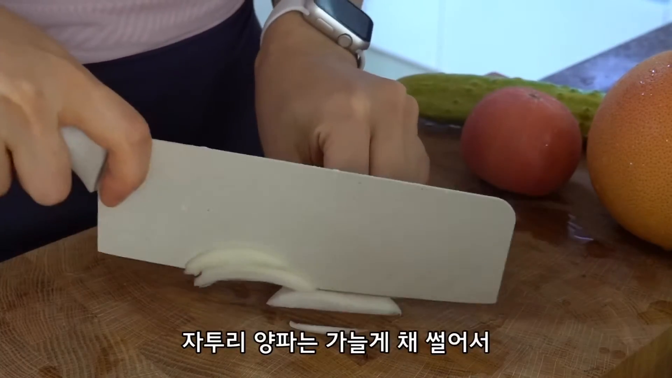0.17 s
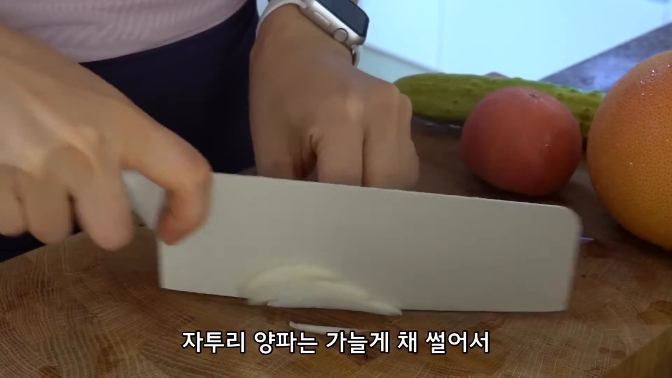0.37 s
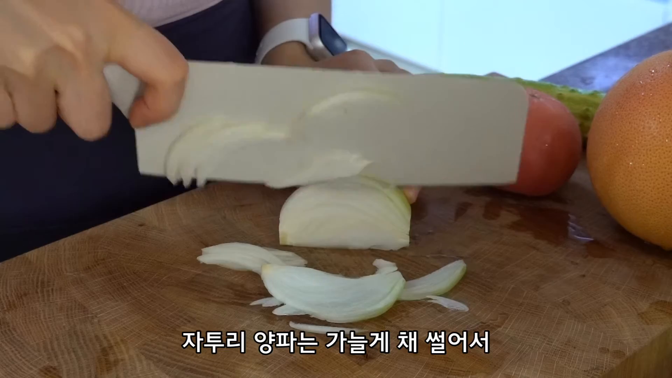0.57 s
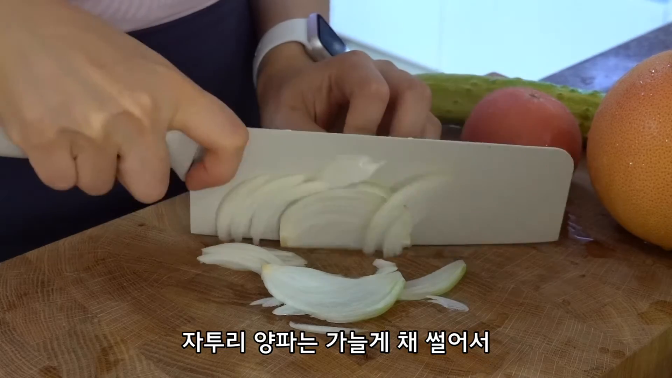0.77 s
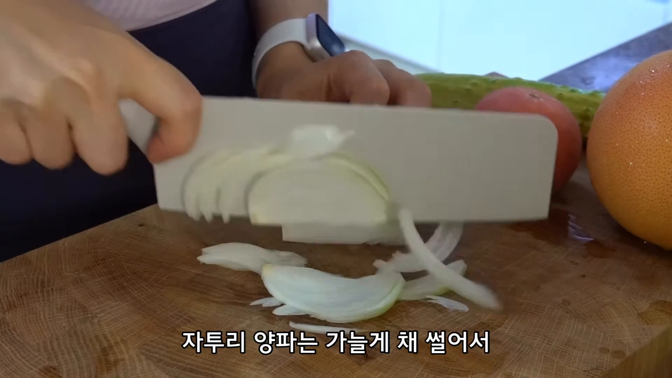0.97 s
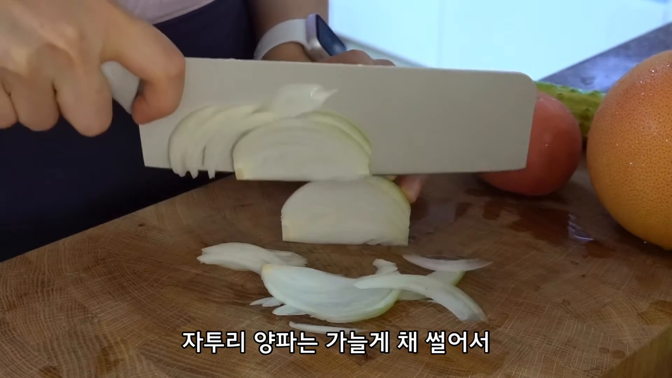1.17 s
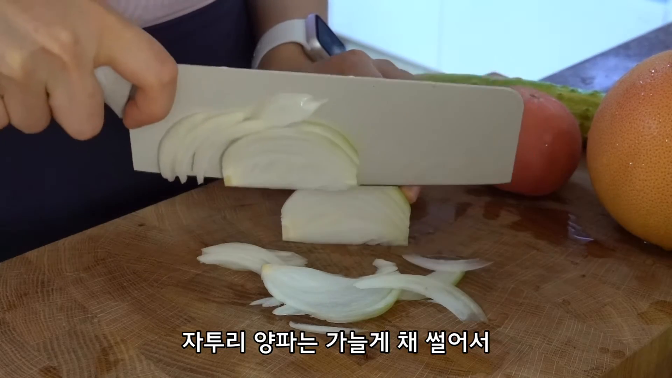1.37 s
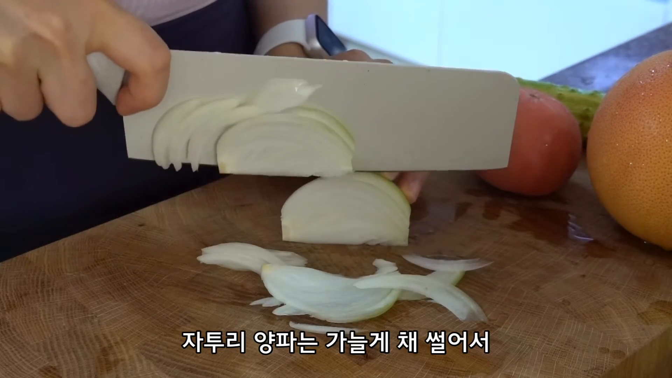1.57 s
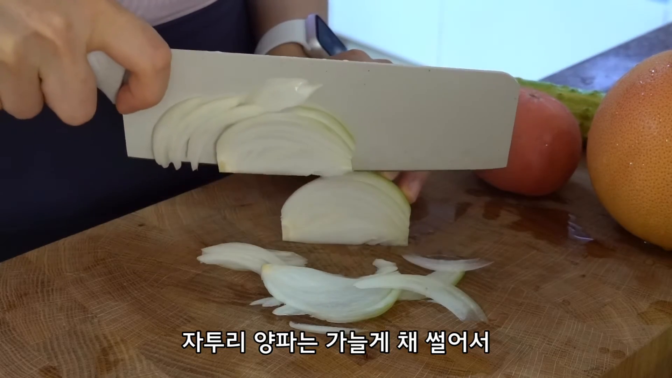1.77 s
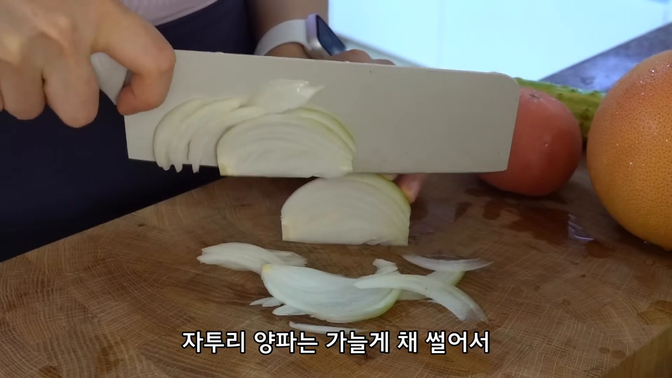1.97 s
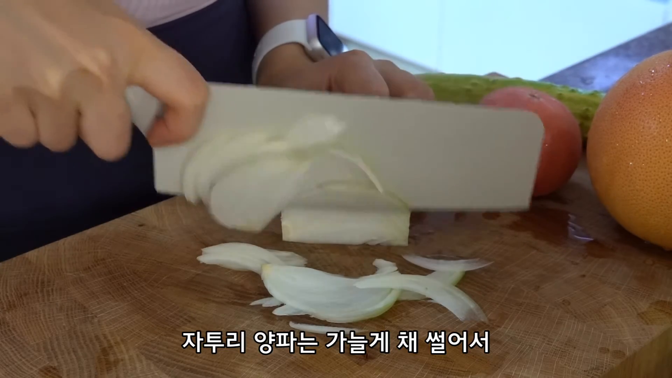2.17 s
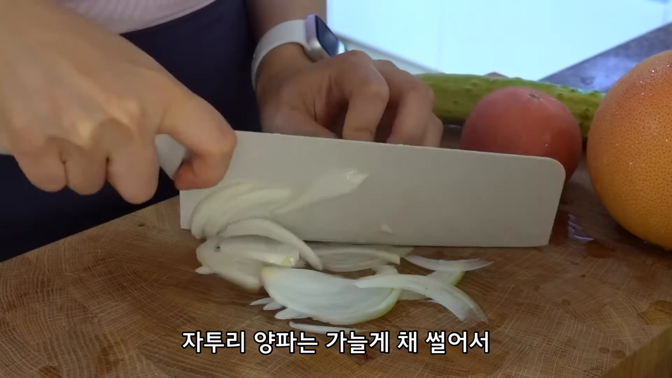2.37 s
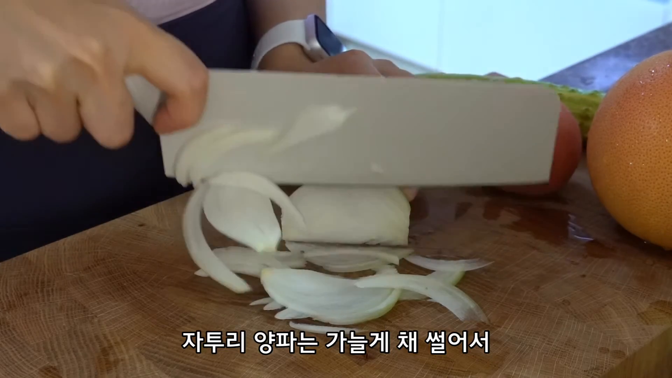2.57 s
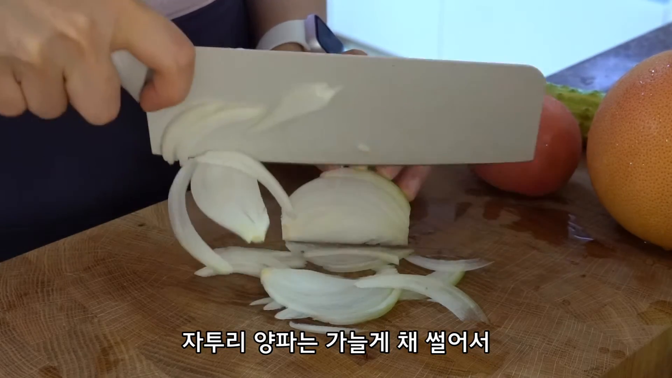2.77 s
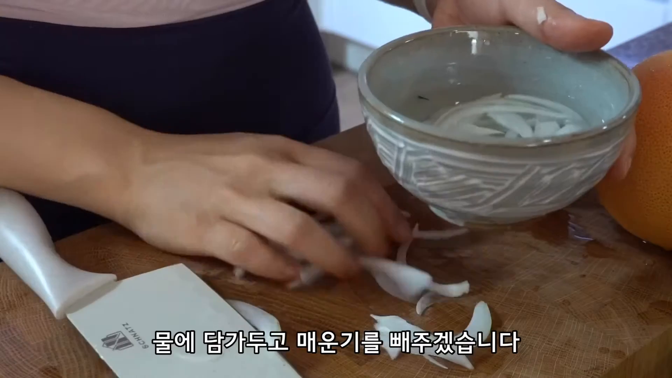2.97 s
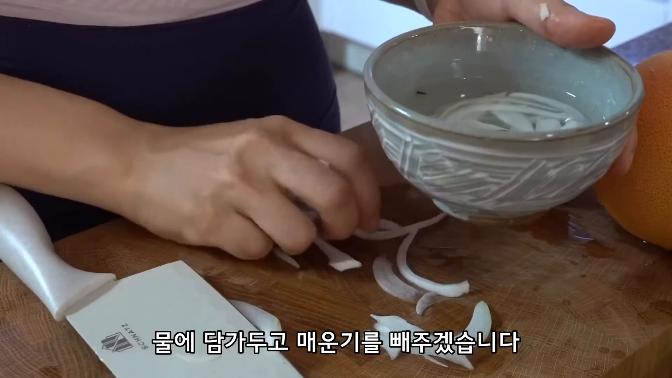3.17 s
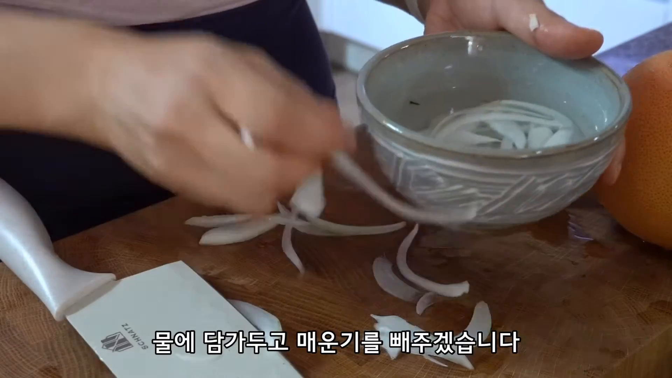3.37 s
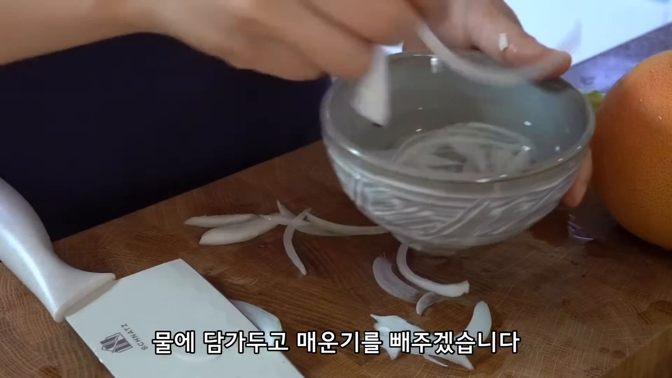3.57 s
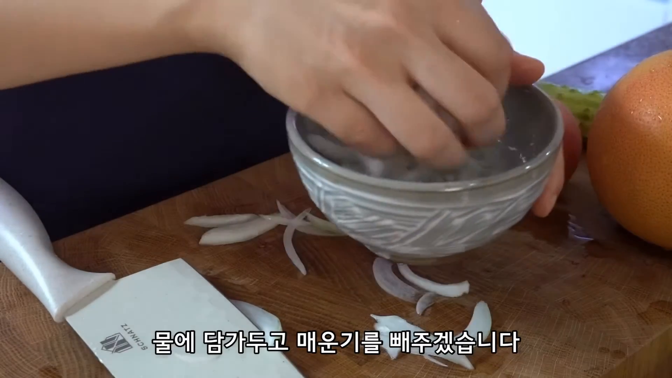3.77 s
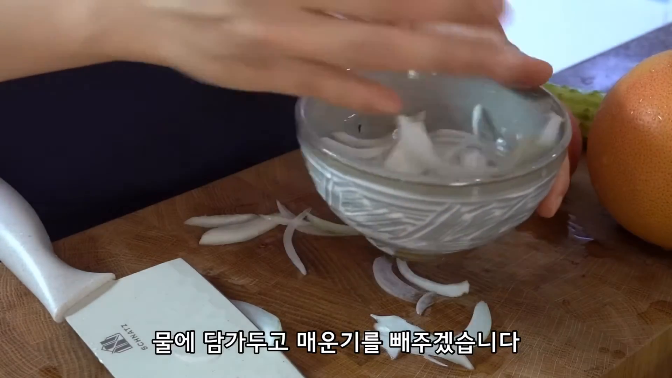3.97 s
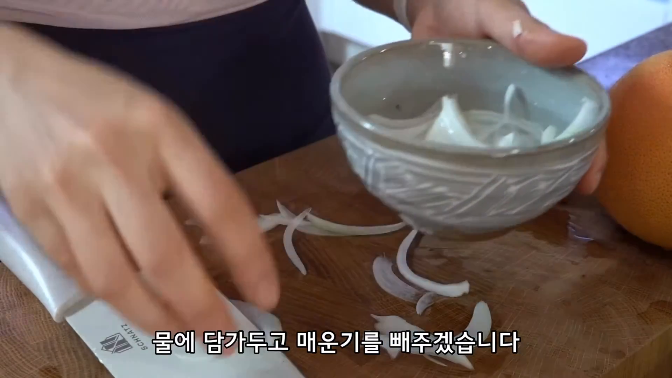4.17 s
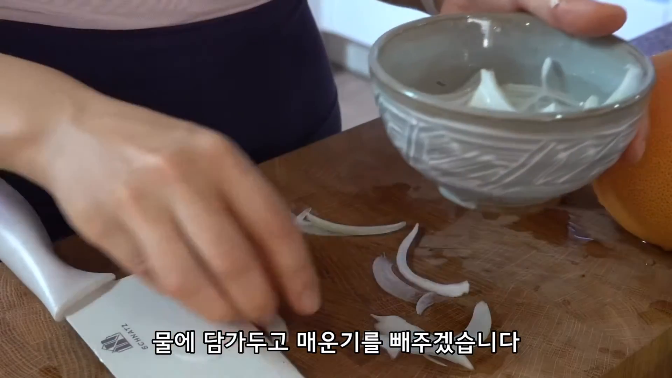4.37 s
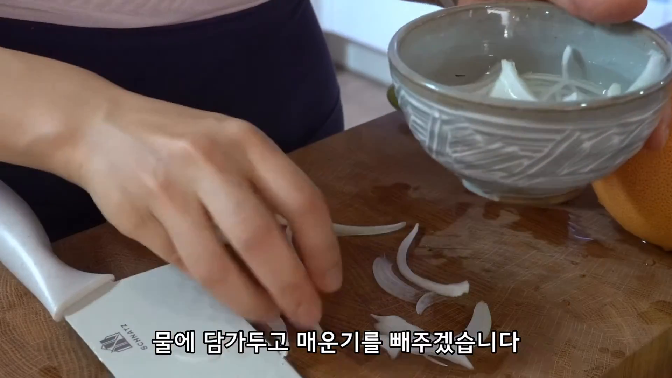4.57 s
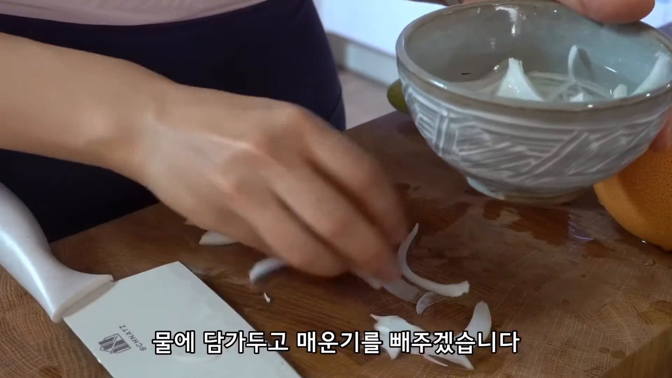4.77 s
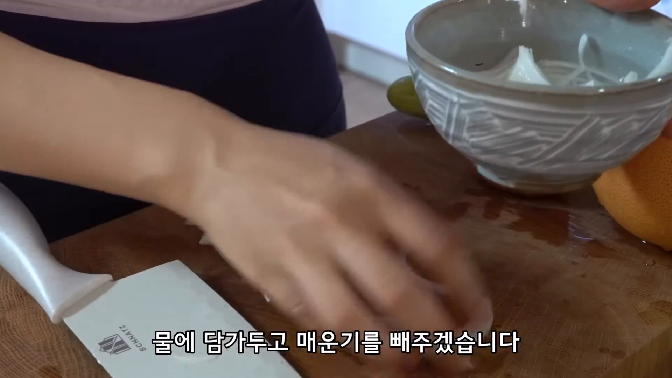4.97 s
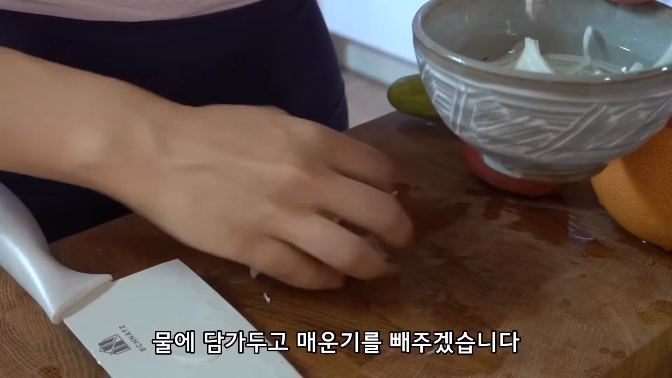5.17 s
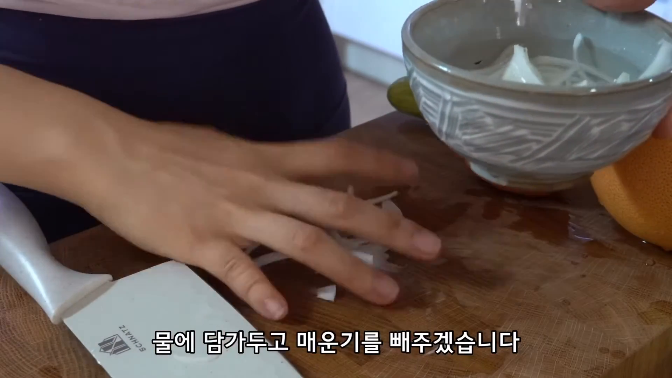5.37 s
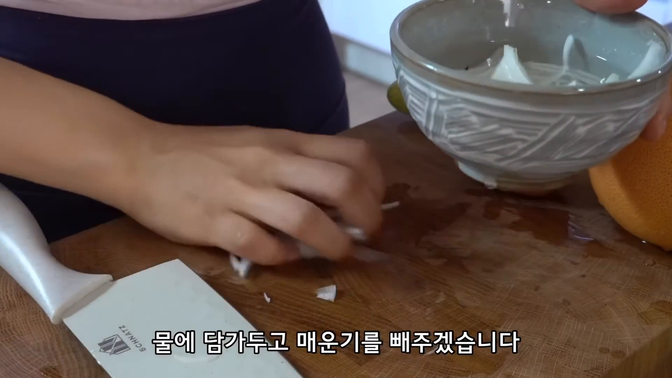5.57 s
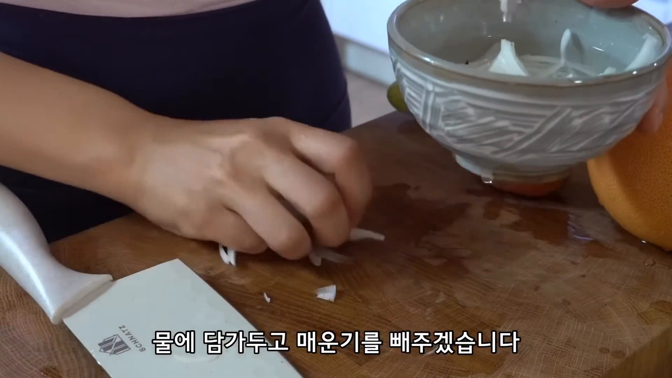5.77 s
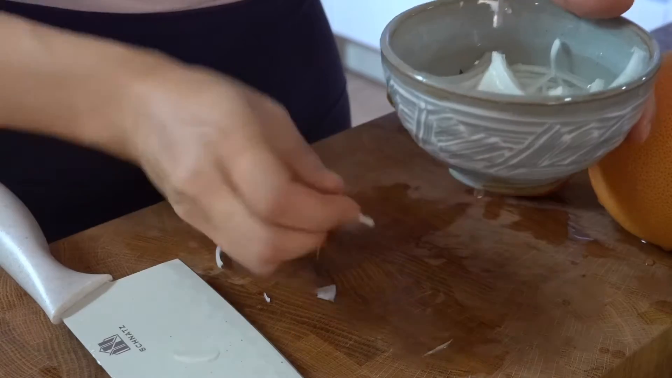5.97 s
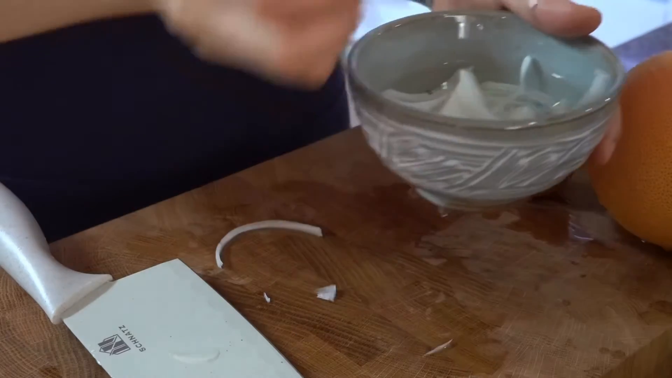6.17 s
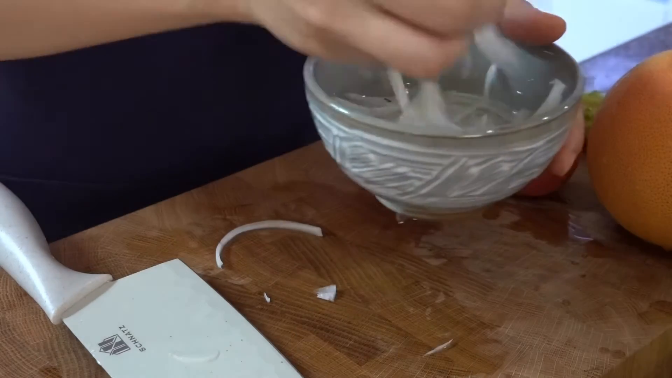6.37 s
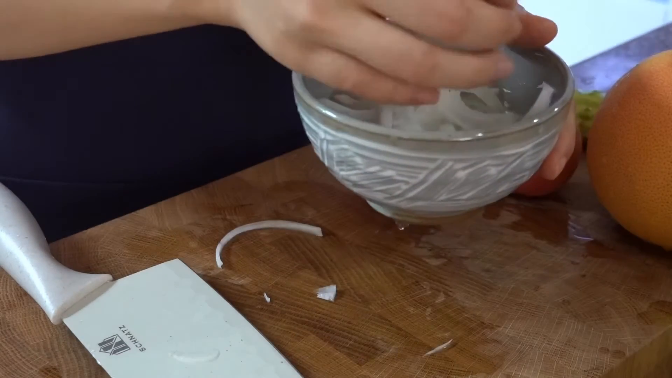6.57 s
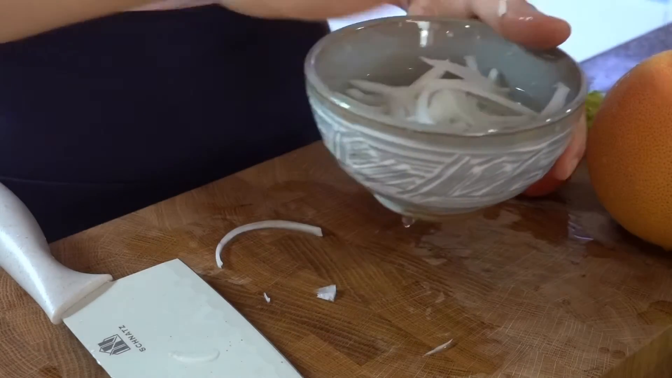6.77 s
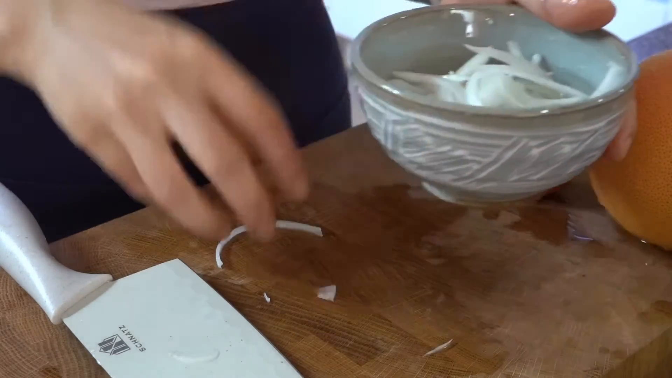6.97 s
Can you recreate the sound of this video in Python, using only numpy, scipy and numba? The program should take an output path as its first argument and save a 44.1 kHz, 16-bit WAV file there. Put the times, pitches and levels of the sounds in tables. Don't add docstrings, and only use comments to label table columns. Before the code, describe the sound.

Close stereo recording of onion being cut on a thick wooden board: crisp crackling, a short blade rasp, then a dull hard knock ringing off tiled walls. Three main cuts come irregularly, with a quiet gap before the last. Afterwards, faint finger rustles gather wet slices, a glazed bowl briefly rattles and rings against the knife handle, and light sweeping continues into near silence.

```python
import sys
import numpy as np
from scipy import signal
from scipy.fft import rfft, irfft, next_fast_len
from scipy.io import wavfile
from scipy.ndimage import uniform_filter1d, minimum_filter1d
from numba import njit

SR = 44100
rng = np.random.default_rng(int(sys.argv[2]) if len(sys.argv) > 2 else 0)


def inscribe(sig):
    pcm = np.round(np.clip(np.atleast_2d(sig).T, -1, 1) * 32767)
    wavfile.write(sys.argv[1], SR, pcm.astype(np.int16))


def boost(x):
    u = np.asarray(x, float) / 20
    return 10 ** u


N = 309141

# centre in Hz, width in Hz, level in dB.
BODY = [(982, 63, 8), (2070, 1020, 3), (3200, 800, 1.5), (390, 170, -4.5), (3780, 430, -6.5)]


def shaped(x, points):
    hz, db = np.transpose(points)
    size = next_fast_len(x.shape[-1])
    log_hz = np.log(np.fft.rfftfreq(size, 1 / SR) + 1)
    gain = boost(np.interp(log_hz, np.log(hz), db))
    return irfft(rfft(x, size) * gain, size)[..., :x.shape[-1]]


def unit(x):
    return x / np.sqrt(np.mean(x ** 2))


def resonate(x, modes):
    out = 0
    for k, (hz, width, db) in enumerate(modes):
        b, a = signal.iirpeak(hz, hz / width, SR)
        out = out + (-1) ** k * boost(db) * signal.lfilter(b, a, x)
    return out


def scatter(modes, db):
    return [(hz, width, d + db * c) for (hz, width, d), c in zip(modes, rng.standard_normal(len(modes)))]


def blow(contact_s):
    t = np.arange(4096) / SR / contact_s
    return t * np.exp(-t)


def add(track, s, sound, peak_db):
    i = int(s * SR)
    track[i:i + len(sound)] += (boost(peak_db) * sound / np.abs(sound).max())[:N - i]


def play(sound, times_s, levels_db):
    t = np.arange(N) / SR
    gate = uniform_filter1d(1. * (t > times_s[0]) * (t < times_s[-1]), size=128)
    return unit(sound) * gate * boost(np.interp(t, times_s, levels_db))


def swell(sound, start, fullest, end, db, edge_db):
    return play(sound, [start, fullest, end], [db + edge_db, db, db + edge_db])


def stereo_noise(size, width):
    mid, side = rng.standard_normal((2, size))
    side = shaped(side, width)
    return np.array([mid + side, mid - side])


def air():
    # frequency in Hz, level in dB per Hz.
    colour = [(15, -77), (25, -44), (161, -17.5), (242, -17), (309, -5.5), (451, -8), (489, -2.5),
              (545, -8.5), (1020, -5.5), (1650, -9.5), (2000, -3), (2840, -15), (3620, -17), (4490, -21.5),
              (16000, -28.5)]
    # frequency in Hz, side minus mid in dB.
    width = [(60, -53), (110, -44), (200, -16), (380, -14.5), (700, -6.5), (1290, -4.5), (2380, -5.5),
             (4400, 4), (8120, -1), (15000, 2)]
    return unit(shaped(stereo_noise(N, width), colour)) * boost(-54)


def room():
    # centre in Hz, t60 in seconds.
    decays = [(150, 0.78), (500, 0.5), (1000, 0.59), (2000, 0.67), (4000, 0.69), (8000, 0.55),
              (14000, 0.54)]
    # frequency in Hz, side minus mid in dB.
    width = [(60, -8), (110, -28), (200, -50), (380, -21), (700, -13.5), (1290, -10.5), (2380, -12),
             (4400, 4), (8120, 0), (15000, 3.5)]
    echo_s, echo_db = .0135, -3.5
    standing_hz, standing_t60_s, standing_db = 153.1, 0.47, -19.5
    t = np.arange(SR) / SR
    noise, tail = stereo_noise(SR, width), 0
    for hz, t60 in decays:
        band = shaped(noise, [(hz / 22.5, -40), (hz / 1.51, -3), (hz, 0), (hz * 1.3, -3), (hz * 1.5, -24)])
        tail = tail + band * boost(-60 * t / t60)
    tail = tail + boost(standing_db - 60 * t / standing_t60_s) * np.sin(2 * np.pi * standing_hz * t)
    lump = np.exp(-(t % echo_s) / 0.002) * (t > echo_s)
    flutter = 1 + boost(echo_db + 13.5 - 60 * t / .5) * lump
    tail = tail * flutter * (1 - np.exp(-t / 0.0009))
    return tail / np.sqrt(np.mean(np.sum(tail ** 2, axis=1)))


def murmurs():
    # start, fullest and end in seconds, level in dB.
    rub = [
        (4.235, 4.25, 4.32, -52.5),
        (4.314, 4.39, 4.43, -47),
    ]
    stir = [
        (1.114, 1.45, 1.72, -55),
    ]
    distant = [
        (0.0, -0.005, 0.03, -45.5),
        (0.032, 0.085, 0.14, -54.5),
        (6.503, 6.912, 9.4, -60.5),
    ]
    noise, out = rng.standard_normal(N), 0
    for mode, rows, edge_db in (
            ((2430, 50, 0), rub, -13), ((1940, 550, 0), stir, -16), ((708, 150, 0), distant, -13)):
        sound = resonate(noise, [mode])
        out = out + sum(swell(sound, *row, edge_db) for row in rows)
    return out


def clinks():
    # start in seconds, then peaks of ring, glaze tick and wood in dB.
    touches = [(4.333, -40, -66, -33), (4.3975, -26.5, -48, -26.5), (4.462, -29.5, -44, -20),
               (4.481, -15, -39, -22.5), (4.488, -17.5, -31, -16), (4.4946, -10, -25, -13.5),
               (4.503, -8, -41, -9.5), (4.511, -20.5, -31, -35), (4.526, -15.5, -45, -23),
               (4.6628, -27.5, -33, -19), (4.679, -11, -40, -30), (4.6837, -8.5, -15, -15.5),
               (4.6931, -4, -11.5, -3), (4.710, -8.5, -24, -10), (4.727, -12, -59, -21)]
    # centre in Hz, width in Hz, level in dB.
    bowl = [(2104, 71, -2), (2376, 26, 3.5), (2720, 79, 6), (2866, 28, 4.5), (2960, 580, -8.5),
            (4340, 47, -7.5)]
    glaze = [(3900, 240, 1), (5600, 900, -2), (6800, 560, 2), (8300, 900, -6.5), (9620, 1000, -6.5),
             (11200, 730, -11.5)]
    counter = [(215, 16.5, -6), (351, 23, -4.5), (566, 45, -2.5), (808, 112, -3.5), (1023, 130, 5),
               (1634, 112, 11.5)]
    ring, wood, ticks = np.zeros((3, N))
    t = np.arange(4096) / SR
    spot_db, push_band = 2.5, [(2470, 3000, 0)]
    for s, ring_db, tick_db, wood_db in touches:
        grit = rng.standard_normal(4096)
        push = resonate(resonate(blow(.0012) * grit, push_band), push_band)
        add(ring, s, resonate(push, scatter(bowl, spot_db)), ring_db)
        thud = resonate(blow(0.0002), [(720, 920, 0)])
        add(wood, s, resonate(thud, counter), wood_db)
        chatter = resonate(np.exp(-t / 0.0044) * grit, [(5900, 17000, 0)])
        add(ticks, s, resonate(chatter, scatter(glaze, spot_db)), tick_db)
    return ring, wood, ticks


def snaps():
    # start in seconds, peak in dB, pitch in Hz, body in dB relative to the peak.
    cracks = [(0.0608, -43.5, 11200, 9), (0.1373, -32.5, 8400, 0.5), (0.188, -35, 10400, -11),
              (0.411, -25, 11500, 3), (0.533, -63, 6940, -16), (0.5567, -10.5, 9000, -0.5),
              (0.825, -25.5, 10700, 3), (0.8802, -27.5, 8700, -26), (1.943, -50, 13200, -16),
              (1.9865, -26.5, 5800, -4), (2.0273, -30.5, 7800, -25), (2.0668, -18.5, 8000, -8),
              (2.1202, -13.5, 7400, -13), (2.1783, -19, 11300, 4), (2.4887, -45, 9000, -13),
              (3.052, -32, 9900, 0), (3.3168, -45, 8340, -15), (3.7524, -43, 14700, -8),
              (4.351, -46, 11200, -12), (4.64, -41, 5650, -17), (5.5145, -42, 9400, -9),
              (5.6379, -24, 7800, -18), (5.644, -38, 5400, -17), (5.7448, -40, 9500, -12),
              (5.7528, -35, 9700, -6), (5.7716, -26, 11900, -13), (5.8006, -39.5, 10200, -3),
              (6.3989, -42.5, 7840, -4), (6.432, -45, 5560, -7), (6.645, -52, 6100, 10)]
    squelches = [(0.2225, -25.5, 8300, -7), (0.247, -28, 8400, -20), (2.1485, -23, 10600, -2),
                 (2.1837, -24, 8930, 2), (2.8512, -38, 9620, -3), (2.945, -38, 9290, -5),
                 (3.0273, -43, 10200, -14), (3.0736, -39.5, 9530, -1), (3.344, -43.5, 10600, -6),
                 (3.3538, -40, 9050, 1), (3.7554, -47, 14500, -14.5), (4.3969, -45.5, 6050, 2),
                 (4.4094, -40, 14600, 0), (4.9994, -43.5, 6760, 6), (5.0287, -43, 7460, -3),
                 (5.5952, -29.5, 9400, -4.5), (5.6044, -34.5, 10000, -12), (5.6379, -40, 6800, -10),
                 (5.776, -42, 10500, 4)]
    # start in seconds, peak in dB, pitch in Hz.
    taps = [(0.224, -18, 2950), (0.535, -25, 2150), (0.5912, -21.5, 2600), (0.632, -29, 1900),
            (0.2349, -5.5, 2240), (0.2579, -10, 2150), (1.9859, -29, 2380), (2.0298, -26.5, 1950),
            (2.0669, -24, 2620), (2.1774, -19.5, 2800), (2.1854, -20, 1940), (2.8918, -40, 2720),
            (2.9108, -35.5, 2460), (3.0094, -38, 2040), (3.053, -30, 2830), (3.0714, -39, 2120),
            (3.1363, -39, 2740), (3.2126, -37.5, 2560), (3.2412, -36, 2403), (5.6426, -35.5, 2830),
            (5.7718, -37, 2150)]
    out = np.zeros(N)
    t = np.arange(4096) / SR
    for rows, rise, t60, width in (cracks, 0.00015, 0.0097, .6), (squelches, 0.0019, 0.06, .38):
        for s, db, hz, body_db in rows:
            burst = (1 - np.exp(-t / rise)) * boost(-60 * t / t60) * rng.standard_normal(4096)
            band = [(hz, width * hz, 0)]
            add(out, s, resonate(resonate(burst, band), band), db)
            add(out, s, resonate(burst, BODY), db + body_db)
    for s, db, hz in taps:
        touch = resonate(blow(.00004), [(hz, 450, 0)])
        add(out, s, resonate(touch, [(hz, 300, 0), (3.0 * hz, 900, -12)]), db)
    return out


def crunch():
    # start and end in seconds, final level in dB, rise in dB, body in dB relative to the hiss.
    cuts = [
        (0.11, 0.216, -50.5, 6, 5.5),
        (0.213, .266, -24, 21, -2),
        (0.476, 0.702, -25, 14, -2),
        (1.937, 2.21, -30, 14, -2),
    ]
    # start, fullest and end in seconds, board in dB, wet rustle in dB
    sweeps = [
        (2.846, 2.839, 2.94, -47, -2),
        (2.88, 3.006, 3.25, -44.5, -5.5),
        (3.09, 3.215, 2.6, -60, -11),
        (3.21, 3.32, 3.51, -53.5, -20),
        (3.69, 3.794, 3.89, -51.5, -14.5),
        (4.328, 4.431, 4.93, -52, -9.5),
        (4.95, 5.025, 5.21, -52, -3.5),
        (5.31, 5.408, 5.48, -53.5, -19),
        (5.471, 5.553, 5.67, -44.5, -11),
        (5.672, 5.807, 5.87, -54, -8),
    ]
    # frequency in Hz, level in dB per Hz.
    hiss_colour = [(2060, -41), (3500, -24), (5060, -3.5), (6360, 2.5), (7800, 1), (8580, -1.5),
                   (11000, 3.5), (16000, -8.5)]
    rustle_colour = [(2060, -22), (3500, 1), (4630, -31), (7040, 1), (9380, 15), (11300, 14), (13200, 3),
                     (16000, -5)]
    # centre in Hz, width in Hz, level in dB.
    finger_modes = [(530, 180, -1), (1026, 68, 10), (2200, 1180, 7), (2950, 1000, 0)]
    spread_db, clump_db, edge_db = 1.8, 1.6, -14
    cell = np.minimum(rng.exponential(size=N // 24 + 1), 4).repeat(24)[:N]
    slow = uniform_filter1d(cell - cell.mean(), size=400)
    clumps = unit(uniform_filter1d(slow, size=400))
    grain = boost(spread_db * uniform_filter1d(cell, size=24) + clump_db * clumps)
    cells = grain * stereo_noise(N, [(2000, -39), (5000, -15), (9000, -34.0), (14000, -10)])
    hiss, body = shaped(cells, hiss_colour), resonate(cells, BODY)
    rustle, board = shaped(cells, rustle_colour), resonate(cells, finger_modes)
    out = 0
    for start, end, db, rise_db, body_db in cuts:
        for layer, top_db in (hiss, db), (body, db + body_db):
            out = out + play(layer, [start, end], [top_db - rise_db, top_db])
    for start, fullest, end, db, wet_db in sweeps:
        for layer, top_db in (board, db), (rustle, db + wet_db):
            out = out + swell(layer, start, fullest, end, top_db, edge_db)
    return out


def skids():
    # start, fullest and end in seconds, level in dB.
    slides = [
        (.214, .222, .275, -24),
        (.662, .687, .705, -21),
    ]
    # centre in Hz, width in Hz, level in dB.
    modes = [(1400, 250, 6), (2150, 240, -1.5), (2950, 260, -0.5), (3830, 370, -6.5)]
    rasp = resonate(resonate(rng.standard_normal(N), modes), [(2500, 1200, 0)])
    return sum(swell(rasp, *row, -10.5) for row in slides)


def knocks():
    # start in seconds, peak in dB, contact brightness in dB per octave,
    # top of the knock in Hz, boost of the modes heard near the edge in dB.
    landings = [
        (0.2694, -5.5, -5.5, 2680, 5),
        (0.5572, -34.5, -11, 3300, -9),
        (0.6977, -3.5, -3.5, 2260, 1),
        (0.888, -44, -21, 2310, -1),
        (2.2141, 3, 1.5, 3140, 2.5),
    ]
    # centre in Hz, width in Hz, level in dB.
    board = [(90, 16, -72), (144.6, 4.1, -30.5), (318, 105, -20.5), (485, 124, -19.5), (718, 290, -21.5),
             (946.5, 82, -1), (1039, 94, 0), (1192, 120, -9.5), (1457, 62, -5), (1950, 196, -5),
             (2417, 64, -9), (2845, 124, -4.5), (3890, 1330, -24.5)]
    out = np.zeros(N)
    for s, db, tilt_db, top_hz, edge_db in landings:
        modes = []
        for hz, width, level_db in scatter(board, 1.0):
            level_db += tilt_db * np.log2(max(hz, 900) / 1500)
            level_db += edge_db * (1100 < hz < 1600)
            modes.append((hz, width, level_db))
        soft = signal.butter(5, top_hz, fs=SR, output="sos")
        add(out, s, signal.sosfilt(soft, resonate(blow(.00003), modes)), db)
        add(out, s, resonate(blow(.00003), [(4930, 15000, 0)]), db - 11.0)
    return out


def scene():
    shots_s = [
        0,
        .481,
        2.846,
        7.02,
    ]
    fade_s = .003
    hits, rasp, small = knocks(), skids(), snaps() + crunch() + murmurs()
    bowl, wood, ticks = clinks()
    direct = boost(3.5) * hits + rasp + bowl + boost(-9) * wood + ticks + small
    far = boost(12.5) * hits + rasp + boost(-6) * bowl + boost(-3.5) * wood
    far = far + boost(-5) * ticks + boost(-5) * small.mean(axis=0)
    out = air()
    for a, b in zip(shots_s, shots_s[1:]):
        shot = slice(int(a * SR), min(int(b * SR), N))
        size = shot.stop - shot.start
        fade = np.minimum(1, np.arange(size)[::-1] / SR / fade_s)
        ring = signal.fftconvolve(far[None, shot], room(), axes=1)[:, :size]
        out[:, shot] += fade * (direct[:, shot] + ring)
    return out


@njit
def recover(gain, step):
    out, g = np.empty(len(gain)), 1.
    for i in range(len(gain)):
        g = min(gain[i], g + (1 - g) * step)
        out[i] = g
    return out


def low_pass(x):
    return signal.sosfilt(signal.butter(12, 16960, fs=SR, output="sos"), x)


def record(dry):
    ceiling, release_s, top_hz = boost(-1.5), 0.012, 16150
    need = np.minimum(1, ceiling / (np.abs(dry).max(axis=0) + 1e-9))
    ahead = minimum_filter1d(need, size=257)
    gain = uniform_filter1d(recover(ahead, 1 / (release_s * SR)), size=129)
    lowpass = signal.ellip(8, .2, 60, top_hz, fs=SR, output="sos")
    heard = signal.sosfilt(lowpass, dry * gain)
    return low_pass(heard)


dry = scene()
out = record(dry)
inscribe(out)
```